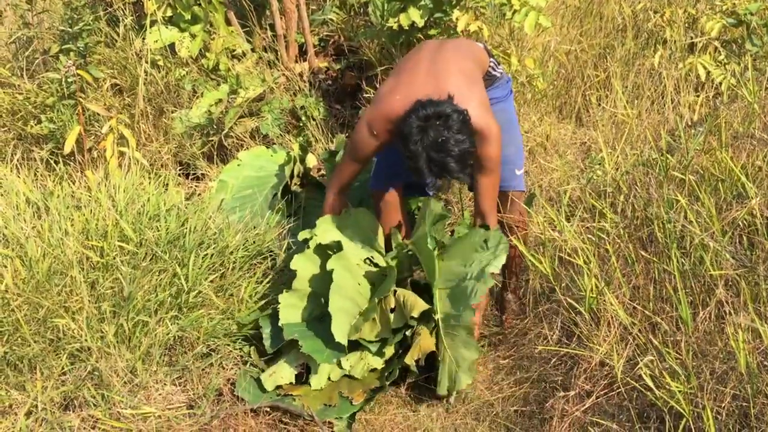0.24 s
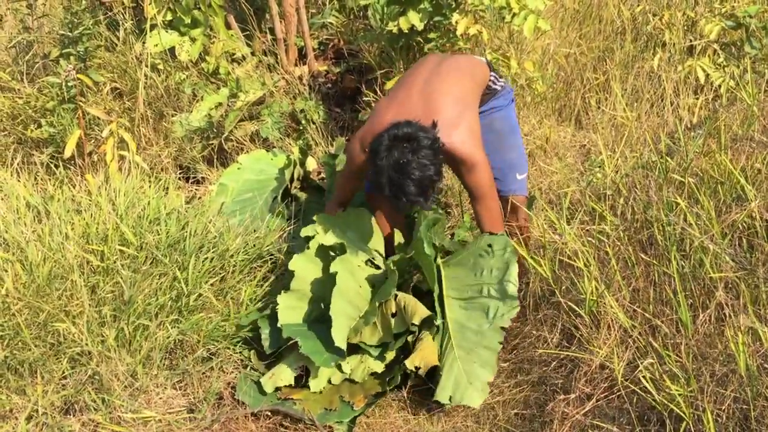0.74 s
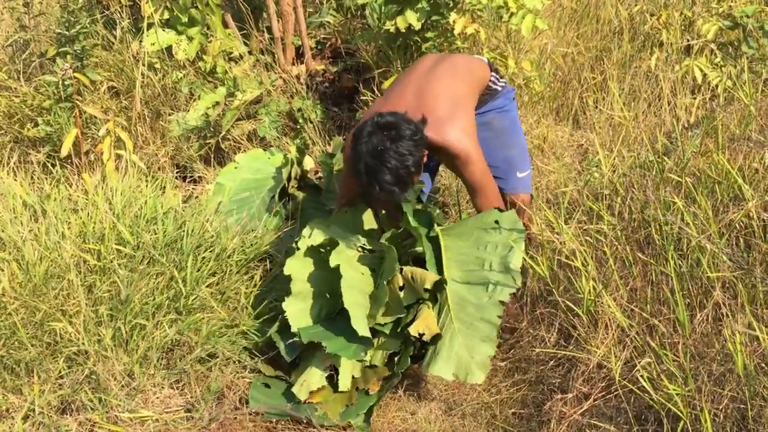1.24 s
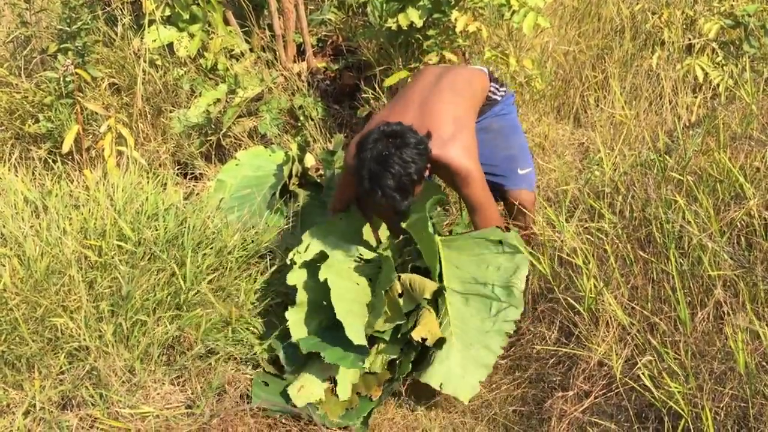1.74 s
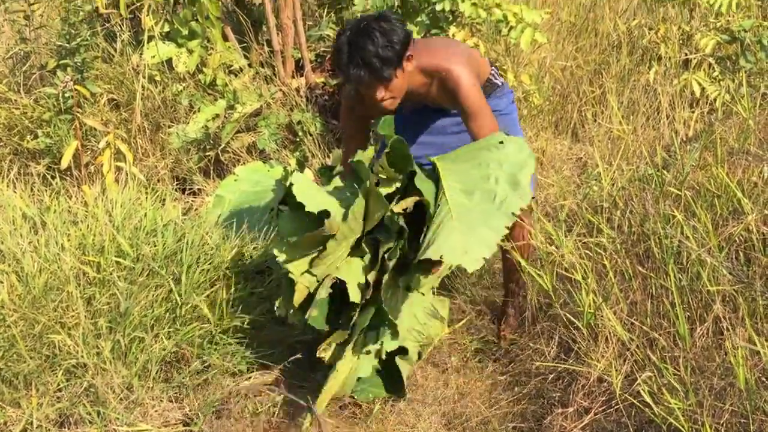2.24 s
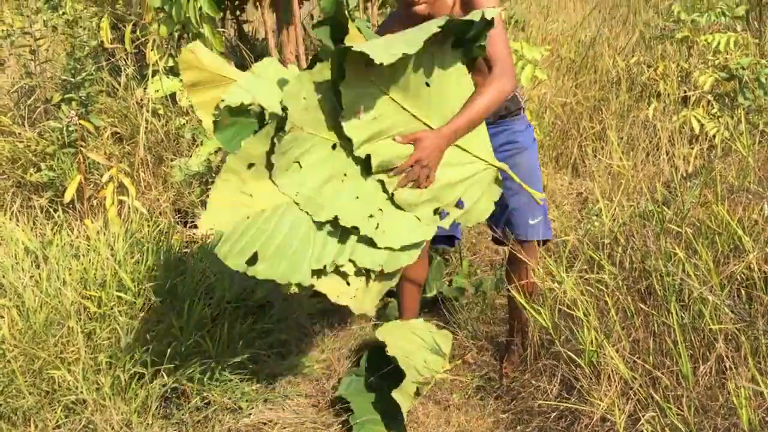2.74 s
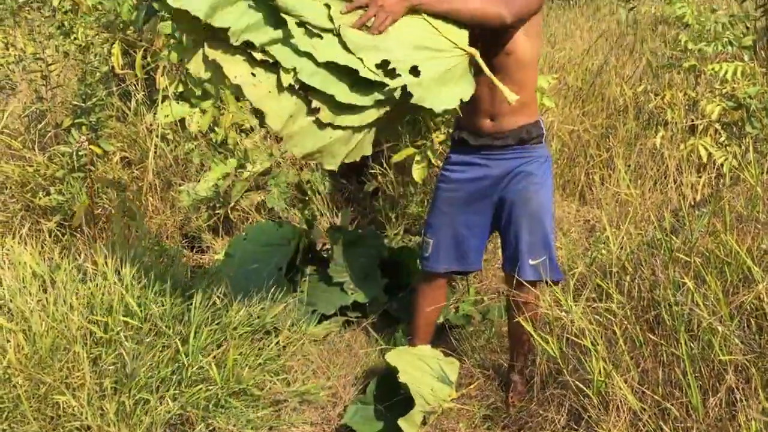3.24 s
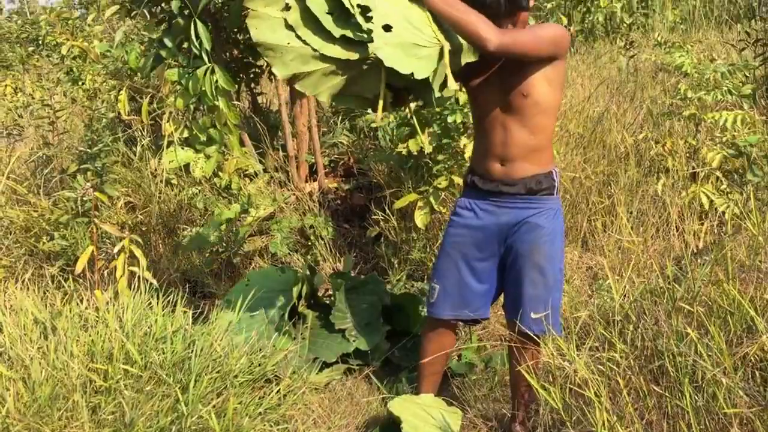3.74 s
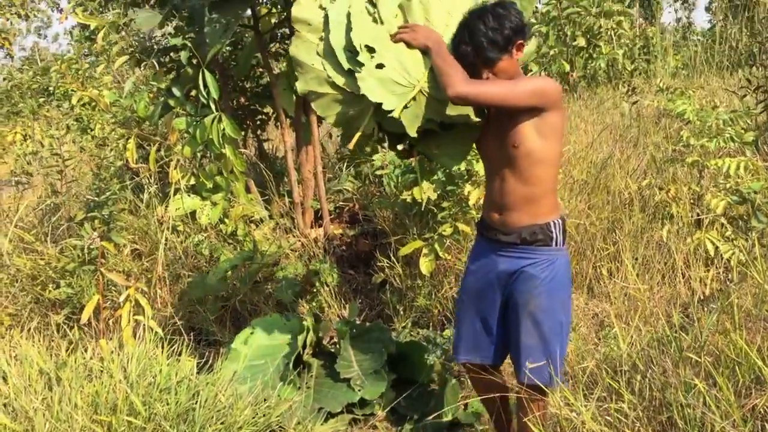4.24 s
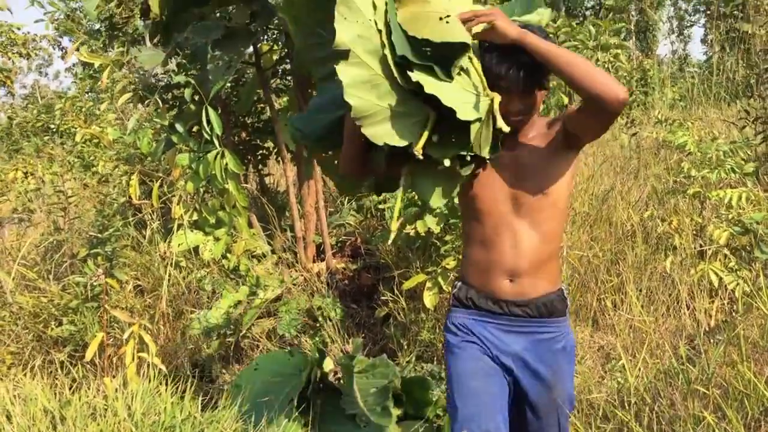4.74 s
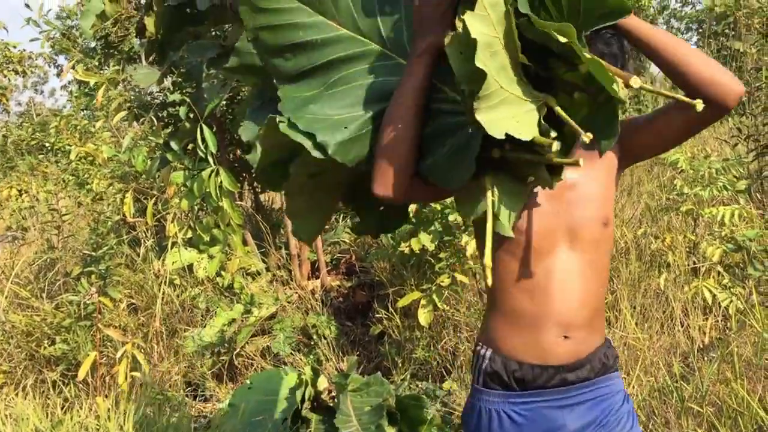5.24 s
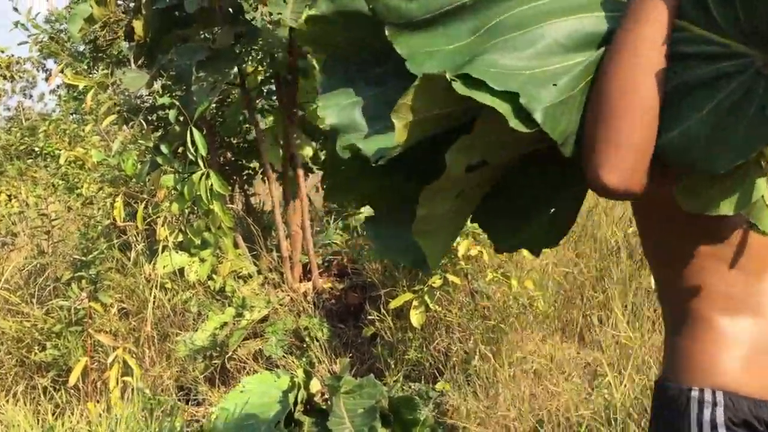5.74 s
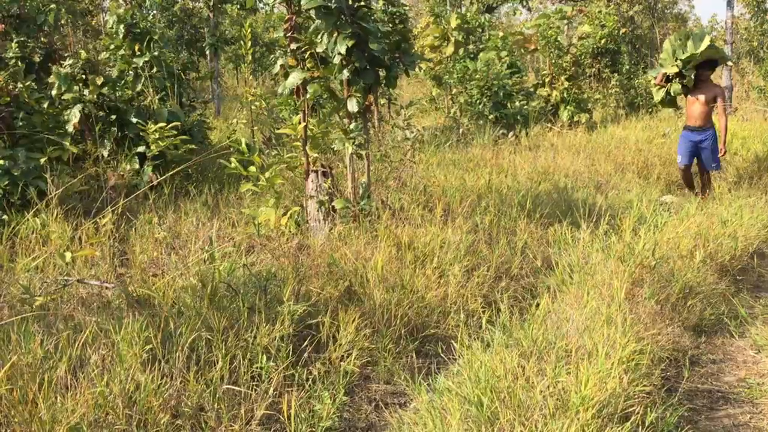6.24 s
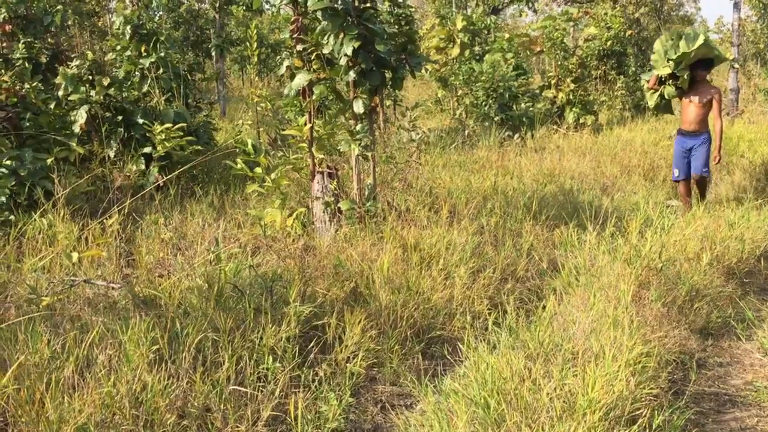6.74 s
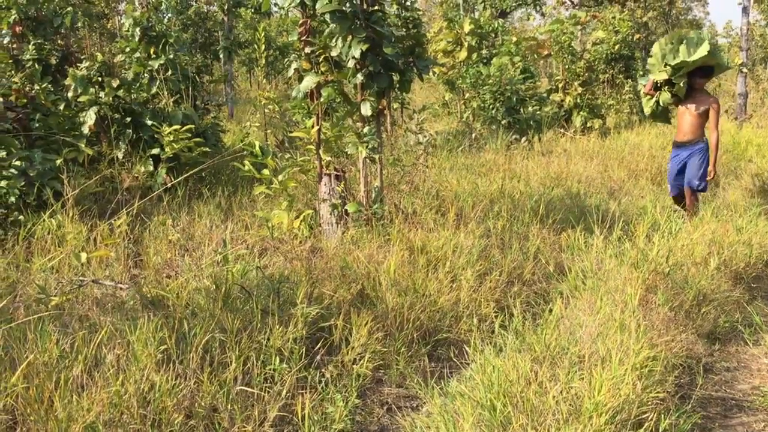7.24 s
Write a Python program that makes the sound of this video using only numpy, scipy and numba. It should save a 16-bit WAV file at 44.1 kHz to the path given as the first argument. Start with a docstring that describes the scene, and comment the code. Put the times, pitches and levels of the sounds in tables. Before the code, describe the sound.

An armful of big leaves is gathered from dry grass near one microphone in an open field. Creases crackle, ribs and stalks pop, and whole blades flap softly. The handling eases, stirs again with lighter crunches, then becomes crisp, hissing swishes as leaves pass very close. A short thin bird whistle slips in between. The end is quiet, with faint leaf movement and low air.

```python
"""Stalks snap and big, stiff leaves crumple at once: an armful is gathered from dry grass and carried close past
one microphone outdoors. Leaves flap, buckle and slide as clouds of damped sines; ribs and stalks snap as runs
of ringing slips with noise cracks; blades rub and flick as shaped noise and swish brightly as they pass.
A bird whistles one short phrase of gliding sines, and air bumps the microphone as brief low sine pulses.
Filtered noise gives the faint hiss and rumble of the open field."""
import sys
import numpy as np
from scipy import signal
from scipy.fft import rfft, irfft, next_fast_len
from scipy.io import wavfile
from numba import njit

SR = 44100
rng = np.random.default_rng(int(sys.argv[2]) if len(sys.argv) > 2 else 0)


def persist_wave(psi):
    """Save psi, clipped to +-1, as 16-bit WAV."""
    counts = np.round(np.clip(psi, -1, 1) * 32767).astype(np.int16)
    wavfile.write(sys.argv[1], SR, np.atleast_2d(counts).T)


N = 329823
TIME = np.arange(N) / SR


def amp(db):
    """Decibels to gain."""
    return 10 ** (np.asarray(db) / 20)


def unit(x):
    """Scale to an rms of 1."""
    return x / np.sqrt(np.mean(x ** 2))


def add(track, s, sound):
    """Mix a short sound in at time s."""
    i = max(int(s * SR), 0)
    track[i:i + len(sound)] += sound[:N - i]


def colour(x, spectrum, skirt_db=24):
    """Causal filter through (Hz, dB) points; beyond the ends it falls skirt_db an octave."""
    size = 2 * next_fast_len(N // 2 + 4096)
    hz, db = np.transpose(spectrum)
    octave = np.log2(np.arange(size // 2 + 1) * SR / size + 1)
    points = np.log2(hz)
    outside = np.abs(octave - np.clip(octave, points[0], points[-1]))
    gain = amp(np.interp(octave, points, db) - skirt_db * outside)
    # folding the cepstrum forward in time makes the filter minimum-phase
    cepstrum = irfft(np.log(gain + 1e-4))
    cepstrum[1:size // 2] *= 2
    cepstrum[size // 2 + 1:] = 0
    return irfft(rfft(x, size) * np.exp(rfft(cepstrum)))[:N]


def band(x, low_hz, high_hz):
    """Second-order Butterworth band-pass."""
    edges = [low_hz, min(high_hz, SR / 2 - 1000)]
    return signal.sosfilt(signal.butter(2, edges, "band", fs=SR, output="sos"), x)


def walk(rate):
    """Random wander in straight lines between rate new values a second, with a spread near 1."""
    levels = rng.standard_normal(N // 64)
    # the straight lines shrink the spread, the root restores it
    return np.interp(TIME * rate, np.arange(len(levels)), levels) * np.sqrt(3 / 2)


@njit
def ring(start, hz, cycles, size, count):
    """Sum of damped sines; each falls by 1 / e in its number of cycles."""
    out = np.zeros(count)
    for k in range(len(start)):
        turn = np.exp((2j * np.pi - 1 / cycles[k]) * hz[k] / SR)
        z, i = size[k] + 0j, int(start[k] * SR)
        for j in range(i, min(count, i + int(6 * cycles[k] * SR / hz[k]))):
            z *= turn
            out[j] += z.imag
    return out


def gesture(s, rise_s, hold_s, fall_s):
    """Gain of one move: it swells, holds and dies away, by 20 dB in each rise or fall time."""
    before = (s - TIME) / max(rise_s, .002)
    after = (TIME - s - hold_s) / max(fall_s, .002)
    return amp(-20 * np.clip(np.maximum(before, after), 0, 10))


def handling():
    """Nominal levels in dB of crumpling, flapping, sliding and sheen; the powers of all moves add up."""
    # Pushes that crush leaves and dry grass. Each row: start of full force in seconds, crumpling level in dB,
    # rise, hold and fall in seconds (rise and fall cover 20 dB), sliding against crumpling in dB.
    pushes = [(0.022, -42.5, 0.15, 0.036, 0.21, -10), (0.237, -48, 0.076, 0.018, 0.17, -13.5),
              (0.381, -45, 0.15, 0.06, 0.053, -8.5), (0.554, -53, 0.092, 0.026, 0.083, -10.5),
              (0.694, -55.5, .15, .03, 0.099, -10), (0.9, -54, 0.26, .1, .2, -16),
              (1.04, -47, 0.069, 0.16, .2, -25), (1.167, -43, 0.17, .12, .14, -6.5),
              (1.487, -49.5, 0.25, 0.053, 0.25, -11.5), (1.59, -48.5, 0.093, 0.15, 0.16, -12),
              (1.925, -42, 0.38, 0.12, 0.43, -6), (2.25, -46.5, 0.18, 0.14, 0.2, -6),
              (2.504, -47, 0.12, 0.064, 0.018, -1.5), (2.813, -55, 0.061, .05, 0.13, -6),
              (3.057, -53, 0.023, 0.013, 0.09, -14), (3.302, -67, 0.22, 0.22, 0.21, -11),
              (3.72, -63, 0.16, 0.17, .1, -6.5), (3.945, -53, 0.22, .05, 0.071, -14.5),
              (4.079, -52, 0.13, 0.1, 0.19, -8.5), (4.526, -58, 0.2, 0.056, .015, -15),
              (5.899, -57, .03, 0.033, 0.055, -10), (6.03, -54.5, .06, 0.062, 0.011, -10),
              (6.124, -50.5, 0.012, 0.04, 0.088, 2)]
    # Blades and grass that brush lightly past each other; the last three rows are faint steps through dry grass
    # further off. Each row: start of full speed in seconds, sheen level in dB, rise, hold and fall in seconds
    # (as above), coarse sliding against sheen in dB.
    swishes = [(0.027, -63, .06, 0.031, 0.079, -3), (4.14, -57.5, 0.13, .14, 0.2, -6.5),
               (4.608, -60, .015, 0.046, 0.16, -8), (4.904, -57, 0.24, 0.074, 0.31, -2),
               (5.247, -48, 0.078, 0.047, .2, -3), (5.368, -54.5, 0.12, 0.068, 0.048, -1.5),
               (5.532, -55.5, 0.056, .06, 0.27, -5.5), (5.72, -52, 0.036, .05, .1, -5.5),
               (5.819, -44.5, 0.11, 0.071, 0.15, -5), (5.975, -51.5, 0.13, 0.12, 0.01, -0.5),
               (6.287, -68, 0.1, 0.2, 0.097, 0.5), (6.68, -75, 0.19, .04, .15, 3.5),
               (6.857, -66, 0.048, .02, 0.2, -1)]
    # Whole blades that flop over. Each row: middle in seconds, flapping level in dB,
    # time from the middle in seconds at which the power is down to 1 / e.
    flops = [(0.35, -60, .02), (0.455, -50, 0.0079), (0.6, -63, 0.0071), (0.862, -58, 0.013),
             (1.062, -50.5, 0.024), (1.23, -55.5, .025), (1.986, -49.5, 0.033), (2.184, -56.5, 0.011),
             (2.563, -53, 0.011), (2.84, -56.5, 0.016), (3.564, -58, 0.0071), (4.05, -58, 0.061),
             (4.52, -59, .02), (4.586, -49.5, 0.009), (4.882, -64.5, 0.051), (5.473, -54, 0.0086),
             (5.91, -55, 0.017), (6.029, -54, 0.019), (6.097, -47.5, 0.0061)]
    # Leaves and grass stir softly between the moves. Each row: time in seconds, crumpling level in dB.
    stirring = [(0.0, -70.5), (2.5, -60.5), (3.2, -67.5), (4.4, -67.5), (5.1, -74.5), (6.3, -69.5),
                (6.6, -78), (7.45, -76)]

    stir = amp(np.interp(TIME, *np.transpose(stirring)))
    # dB against the stirring, in the order crumpling, flapping, sliding, sheen
    power = np.outer(amp([0, -6.5, -8, -11.5]), stir) ** 2
    # in a push: flapping against crumpling, sheen against sliding
    flap_db, sheen_db = -14.5, -7.5
    for s, db, rise_s, hold_s, fall_s, slide_db in pushes:
        shares = amp([0, flap_db, slide_db, slide_db + sheen_db])
        power += np.outer(amp(db) * shares, gesture(s, rise_s, hold_s, fall_s)) ** 2
    # in a swish: both against its sliding
    swish_crumple_db, swish_flap_db = -12.5, -25
    for s, db, rise_s, hold_s, fall_s, slide_db in swishes:
        shares = amp([slide_db + swish_crumple_db, slide_db + swish_flap_db, slide_db, 0])
        power += np.outer(amp(db) * shares, gesture(s, rise_s, hold_s, fall_s)) ** 2
    for s, db, half_s in flops:
        power[1] += amp(db) ** 2 * np.exp(-((TIME - s) / half_s) ** 2)
    return 10 * np.log10(power)


def grains(count, low_hz, high_hz, cycles, spread_db, echo_db, echo_s, order=4):
    """Many tiny patches of leaf buckle, each with its own pitch; most are weak, a few strong."""
    when, strength, pitch = rng.random((count, 3)).T[:, :, None]
    delay, detune, length, side = rng.random((4, count, order))
    # every buckle sets off a few more in the leaves around it
    later = np.arange(order) > 0
    lag = -echo_s * np.log(delay + 1e-6) * later
    hz = low_hz * (high_hz / low_hz) ** np.where(later, detune, pitch)
    hz = np.minimum(hz, SR / 2 - 2000)
    size = amp(-spread_db * np.log(strength + 0.043) + echo_db * later)
    # a longer delay makes a weaker follower; the sign is random
    size = size * delay ** (.5 * later) * np.sign(side - .5)
    # high grains die sooner, so they start harder to carry the same weight
    start = (when * N / SR + lag).ravel()
    return ring(start, hz.ravel(), cycles * (.5 + length.ravel()), (size * hz).ravel(), N)


def shifting(x, gain=0.22, longest_s=.004, count=8):
    """Tumbling blades open and close short echo paths, so the colour keeps shifting."""
    out = x.copy()
    lags = 1 + (longest_s * SR * (np.arange(count) + rng.random(count)) / count).astype(int)
    for lag in lags:
        out[lag:] += gain * (walk(rate=22) * x)[:-lag]
    return out


def rustle(crumple_db, flap_db, slide_db, sheen_db, crisp_share=0.45):
    """Whole leaves flap, creases buckle and rough blades slide, all in the same uneven jerks."""
    # Colours of large creases, small crisp creases, flapping, coarse sliding and its bright sheen.
    # Each row: frequency in Hz, relative level in dB.
    crumple_colour = [(480, -13), (680, -0.5), (850, 1), (1080, -2.5), (1400, 0), (1900, -3.5),
                      (2600, -9.5)]
    crisp_colour = [(1100, -10), (1700, -5), (2300, 1.5), (2950, -1.5), (3400, 1), (4200, -3.5)]
    flap_colour = [(65, -67), (110, -9.5), (150, -12.5), (275, -4), (357, -6), (439, -12.5), (520, -15),
                   (680, -41), (1140, -120)]
    slide_colour = [(400, -40), (1760, -50), (3000, -3), (3380, -3.5), (4840, -2.5), (5670, 0),
                    (7600, -5.5), (8610, -5.5), (10500, -13), (11000, -11), (14300, -40.5), (22000, -120)]
    sheen_colour = [(5590, -27), (9500, -1.5), (10600, -10), (11400, 2), (14100, 3), (15200, 1), (16000, 3)]

    jerk_db = .9 * walk(rate=70)
    creases = grains(count=10000, low_hz=511, high_hz=4730, cycles=2.28,
                     spread_db=3.5, echo_db=0.0, echo_s=.005)
    flaps = grains(count=2500, low_hz=110.7, high_hz=583, cycles=1.64,
                   spread_db=4.0, echo_db=-7, echo_s=0.00828)
    friction = grains(count=36000, low_hz=2410, high_hz=16900, cycles=2.7,
                      spread_db=2.0, echo_db=1, echo_s=.002)
    small_creases = grains(count=7000, low_hz=1230, high_hz=5090, cycles=4.1,
                           spread_db=0.5, echo_db=-2, echo_s=.003)
    creases = shifting(creases)
    friction = shifting(friction, gain=.16, longest_s=.003)
    small_creases = shifting(small_creases)
    # the louder the blades slide, the more small, crisp creases give way
    crisp_db = crumple_db + crisp_share * (slide_db - crumple_db)
    # each layer gets a small fixed trim in dB
    body = unit(colour(creases, crumple_colour)) * amp(crumple_db - 0.94)
    body += unit(colour(small_creases, crisp_colour)) * amp(crisp_db - 3.0)
    body += unit(colour(flaps, flap_colour)) * amp(flap_db + 1.3)
    hiss = unit(colour(friction, slide_colour, skirt_db=10)) * amp(slide_db - 2.33)
    hiss += unit(colour(friction, sheen_colour)) * amp(sheen_db - 0.25)
    return (body + hiss) * amp(jerk_db)


def snap(hz, crack_db, length_s, cycles=5.0, detune=0.092, tail_db=-19, count=6):
    """A rib gives way in a quick run of slips: each rings the blade, while tearing fibres crack."""
    t = TIME[:SR // 10]
    delay, pitch, side = rng.random((3, count))
    progress = (np.arange(count) + delay * (np.arange(count) > 0)) / count
    size = np.exp(-1.1 * progress) * np.sign(side - .5)
    # the slips start high and drop in pitch and strength as more of the blade moves
    pitches = hz * np.exp(detune * (2 * pitch - 1) + 0.28 * (.55 - progress))
    blade = ring(0.693 * length_s * progress, pitches, np.full(count, cycles), size, len(t))
    blade = band(blade, .35 * hz, 3.5 * hz)
    # the pile and the ground add a brief, diffuse tail
    tail = np.exp(-t / .028)
    burst = np.exp(-(t / length_s) ** 2) + amp(tail_db) * tail
    burst *= 1 - np.exp(-t / .0006)  # soft onset
    fibres = band(rng.standard_normal(len(t)) * burst, 740, 8800)
    splinters = band(rng.standard_normal(len(t)) * burst, 0.75 * hz, 1.03 * hz + 900)
    sound = unit(blade) + amp(-1.5) * unit(splinters) + amp(crack_db + 5.5) * unit(fibres)
    return unit(sound) * amp(-17)


def snaps(crumple_db, small_db=5, spread_db=6.0, low_hz=620, high_hz=1700, small_crack_db=-20, count=45):
    """Ribs and stalks break inside the pile; small veins give way at random, as hard as leaves are crushed."""
    # Each row: start in seconds, level in dB (17 dB above the rms over 0.1 s), central pitch in Hz,
    # crack against ring in dB (before the snap's fixed 5.5 dB lift of the crack).
    breaks = [(0.035, -32.5, 1350, -15), (0.05, -32.5, 1500, -17), (0.095, -35.5, 1036, -30),
              (0.17, -39.5, 1820, -32), (0.229, -34.5, 980, -29), (0.329, -23, 1340, -4),
              (0.338, -28, 1400, -7), (0.357, -35.5, 1650, -30), (0.392, -34, 1190, -3.5),
              (0.421, -35, 1740, -5), (0.645, -40, 853, -13), (1.034, -35.5, 1040, -21),
              (1.144, -31, 1290, -20), (1.495, -39.5, 824, -23), (1.534, -37, 1500, -27),
              (1.703, -35, 990, -6), (1.718, -25.5, 1670, -11), (1.797, -35, 1220, -30),
              (1.918, -27.5, 1430, -14), (1.992, -33.5, 3170, -8), (2.205, -37.5, 2690, -22),
              (2.481, -37, 830, 12), (2.516, -31.5, 1810, 1), (2.615, -36, 956, -22),
              (2.782, -37.5, 734, -26), (2.827, -33, 850, -21), (2.913, -45, 526, -13),
              (2.954, -46.5, 690, -30), (3.067, -39, 1680, -12.5), (3.205, -47, 1720, -15),
              (3.309, -50.5, 685, -24), (3.516, -47.5, 820, -30), (3.554, -42, 595, -42),
              (3.738, -47, 676, -20), (3.853, -39, 2450, -15), (3.951, -41, 750, -31),
              (3.988, -36.5, 900, -6), (4.034, -40, 690, -29), (4.061, -36.5, 1300, -2.5),
              (4.144, -37.5, 760, -10), (4.274, -44.5, 640, -30), (4.534, -40, 654, -24),
              (4.587, -39.5, 840, -28.5), (4.76, -44.5, 870, -34), (4.831, -37, 2020, -22),
              (4.851, -38, 1830, -30), (5.466, -51, 558, -25)]
    length_s = 0.00727  # of one break
    out = np.zeros(N)
    for s, db, hz, crack_db in breaks:
        add(out, s, amp(db) * snap(hz, crack_db, length_s))
    for when, strength, pitch in rng.random((count, 3)):
        s = when * breaks[-1][0]  # none after the last listed break starts
        db = crumple_db[int(s * SR)] + small_db + spread_db * (2 * strength - 1)
        hz = low_hz * (high_hz / low_hz) ** pitch
        add(out, s, amp(db) * snap(hz, small_crack_db, length_s))
    return out


def rubs(width=0.16, slip_rate=1500):
    """Blades stick and slip on each other at random, slip_rate times a second, ringing around one pitch."""
    # One blade rubs softly on another. Each row: middle in seconds, pitch in Hz, level in dB,
    # half length in seconds (standard deviation of the bell-shaped swell).
    contacts = [(0.042, 281, -52, 0.041), (2.55, 2320, -50.5, .012), (3.082, 743, -54, 0.027),
                (4.549, 850, -52.5, 0.029), (4.583, 1420, -51, .008), (6.153, 1120, -52, 0.02),
                (6.3, 4630, -55, 0.01)]
    out = np.zeros(N)
    for s, hz, db, half_s in contacts:
        start = max(s - 1 / 8, 0)
        t = start + TIME[:SR // 4] - s
        slips = rng.standard_normal(len(t)) * (rng.random(len(t)) < slip_rate / SR)
        swell = np.exp(-(t / half_s) ** 2 / 2)
        ringing = unit(band(slips, hz / (1 + width), hz * (1 + width)))
        add(out, start, amp(db) * swell * ringing)
    return out


def flicks(decay_s=0.014, spread_db=4, tick_db=-5, scrape_db=-13):
    """Leaf edges slip off each other: a thin tick, then a short, gritty scrape."""
    # Leaf edges that catch and flick free. Each row: start in seconds, level in dB before tick and scrape gains.
    catches = [(2.794, -35), (3.275, -47), (4.3157, -34), (4.434, -44), (4.595, -44), (5.0097, -33),
               (5.8104, -27), (5.898, -20.5), (5.902, -30), (6.349, -42)]
    out, t = np.zeros(N), TIME[:SR // 16]
    for s, db in catches:
        noise, grit = rng.standard_normal((2, len(t)))
        tick = amp(tick_db) * np.exp(-t / 0.000089)
        scrape = amp(scrape_db + spread_db * grit) * np.exp(-t / decay_s)
        add(out, s, amp(db) * noise * (tick + scrape))
    return band(out, 4300, 19000)


def bird(echo_db=-12, echo_s=0.029):
    """One thin, slightly wavering whistle of slurred sine notes, smeared by the trees."""
    # Each row: start in seconds, length in seconds, starting pitch in Hz, glide in Hz per second, level in dB.
    notes = [(5.565, 0.061, 2950, 0, -61), (5.61, 0.034, 3105, -1400, -48), (5.654, 0.045, 3190, 2002, -51),
             (5.693, 0.065, 3170, -1400, -53)]
    song, waver = np.zeros(N), 1 + .008 * walk(rate=250)
    for s, length_s, hz, glide, db in notes:
        t = TIME[TIME < length_s]
        pitch = (hz + glide * t) * waver[int(s * SR):][:len(t)]
        phase = 2 * np.pi * np.cumsum(pitch) / SR
        add(song, s, amp(db) * np.sin(phase) * np.sin(np.pi * t / length_s) ** .5)
    t = TIME[:SR // 8]
    trees = rng.standard_normal(len(t)) * np.exp(-t / echo_s)
    echo = signal.fftconvolve(song, trees / np.linalg.norm(trees))[:N]
    return song + amp(echo_db) * echo


def bumps():
    """Puffs of air push the microphone: each is a short, low sine under a bell-shaped swell."""
    # Each row: middle in seconds, pitch in Hz, level in dB, time from the middle in seconds to 1 / e.
    puffs = [(6.104, 49.5, -45, 0.0076), (6.269, 57, -39, 0.01), (6.289, 45, -49, 0.0091)]
    out = np.zeros(N)
    for s, hz, db, half_s in puffs:
        t = TIME - s
        out -= amp(db) * np.sin(2 * np.pi * hz * t) * np.exp(-(t / half_s) ** 2)
    return out


def field(air_db=-67, rumble_db=-72):
    """Faint open-air hiss over a low, distant rumble, both noise that swells slightly together."""
    # Colour of the open air. Each row: frequency in Hz, relative level in dB.
    air_colour = [(25, -24), (50, -8.5), (80, -0.5), (125, -12.5), (300, -20), (520, -22), (1500, -28.5),
                  (5000, -30), (16000, -38)]
    swell_db = .6 * walk(rate=5)
    air = unit(colour(rng.standard_normal(N), air_colour)) * amp(air_db)
    rumble = unit(band(rng.standard_normal(N), 67.0, 86.7)) * amp(rumble_db)
    return (air + rumble) * amp(swell_db)


def scene():
    """Everything reaches one microphone, so both channels are alike."""
    crumple_db, flap_db, slide_db, sheen_db = handling()
    leaves = rustle(crumple_db, flap_db, slide_db, sheen_db)
    leaves += rubs() + snaps(crumple_db) + flicks()
    mono = leaves + bird() + bumps() + field()
    return np.array([mono, mono])


def record(dry):
    """The recorder cuts the top with a steep elliptic low-pass."""
    top_hz = 15900
    return signal.sosfilt(signal.ellip(10, .2, 70, top_hz, fs=SR, output="sos"), dry)


dry = scene()
out = record(dry)
persist_wave(out)
```